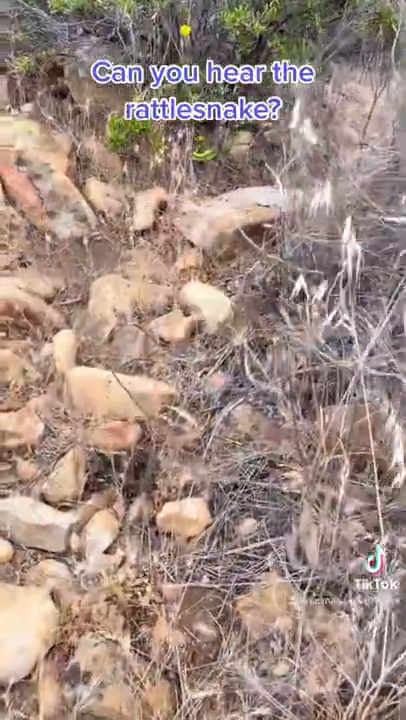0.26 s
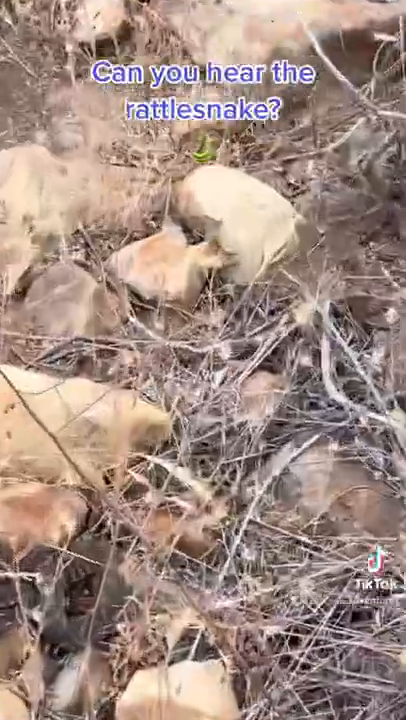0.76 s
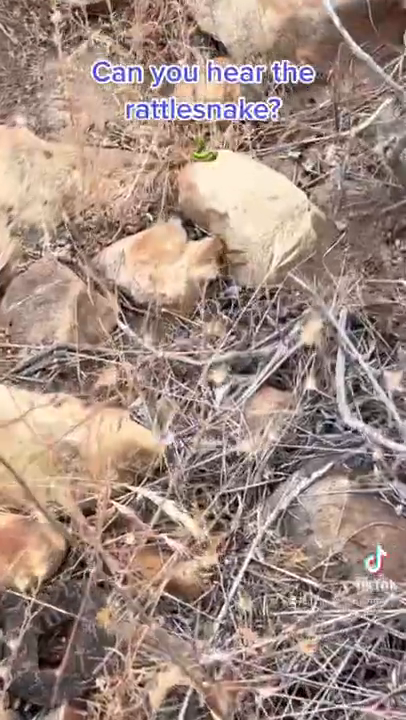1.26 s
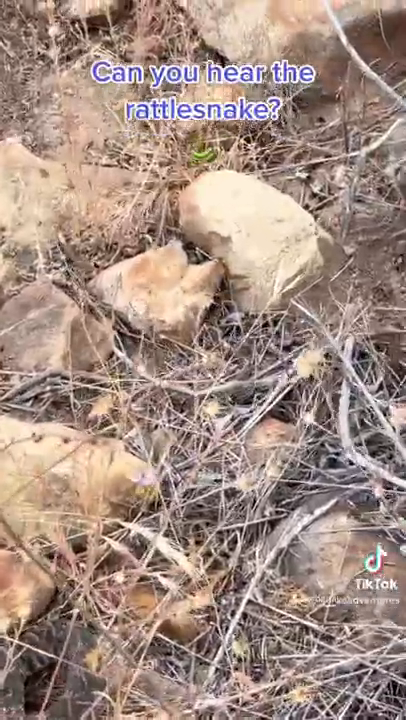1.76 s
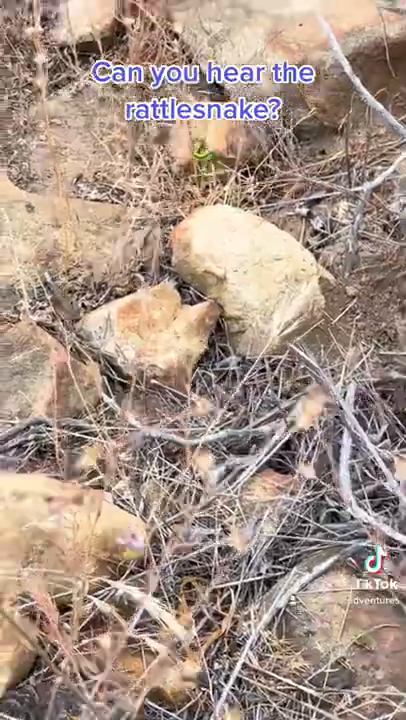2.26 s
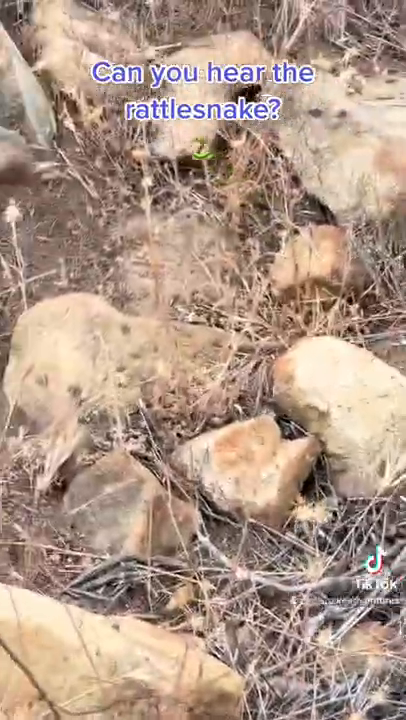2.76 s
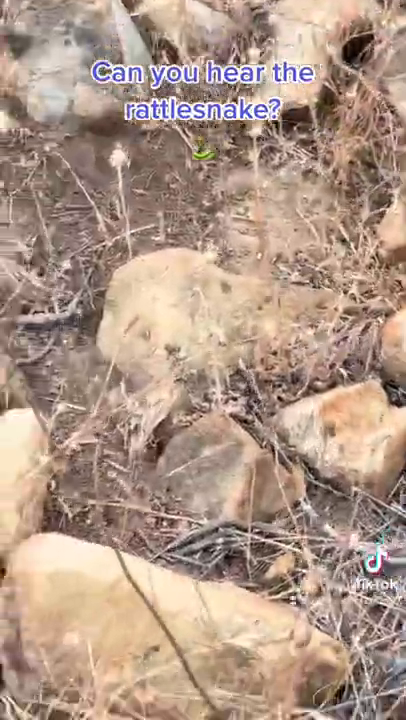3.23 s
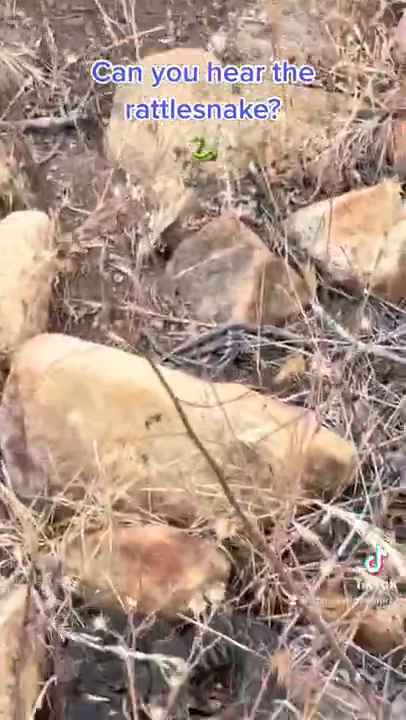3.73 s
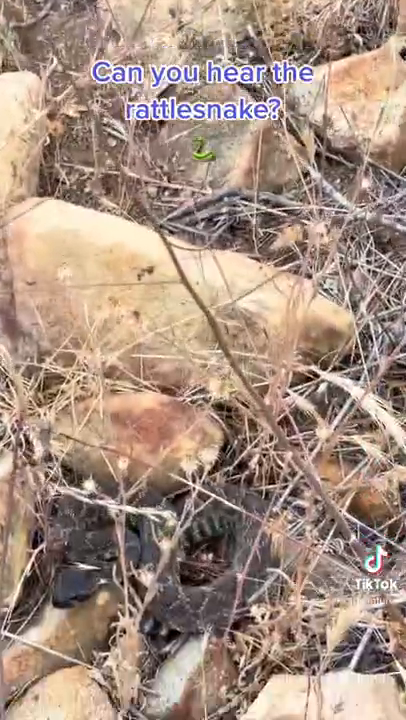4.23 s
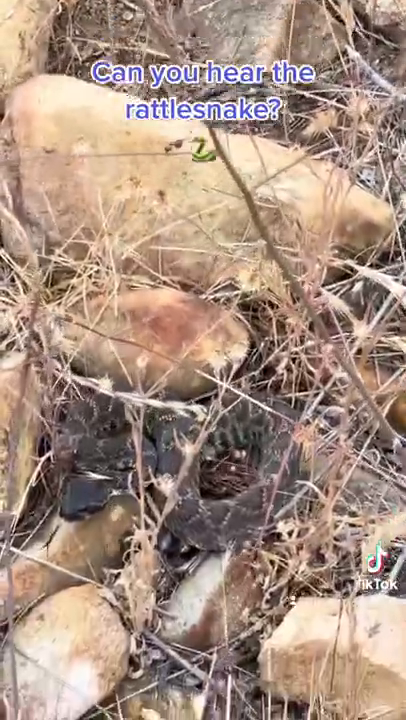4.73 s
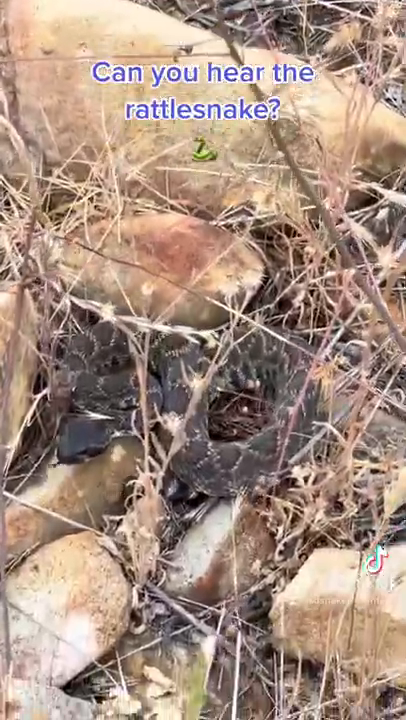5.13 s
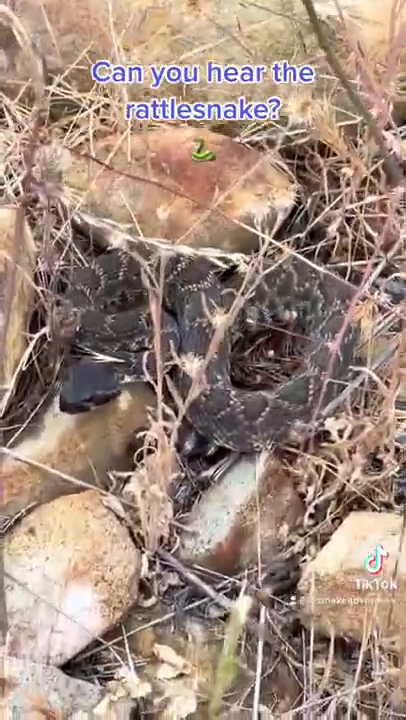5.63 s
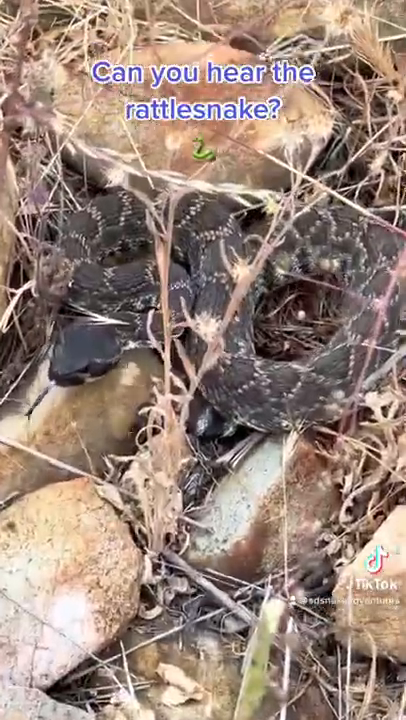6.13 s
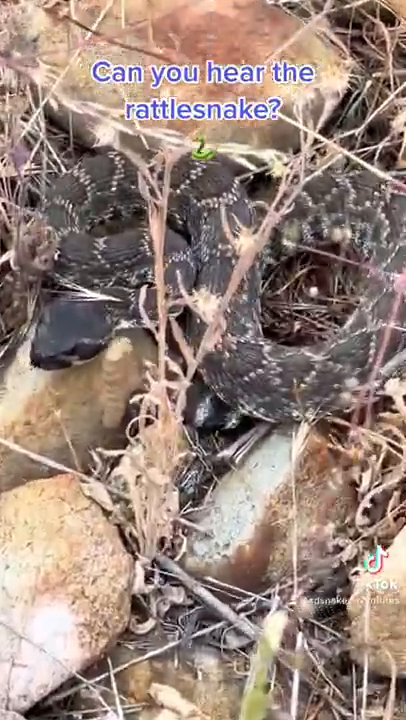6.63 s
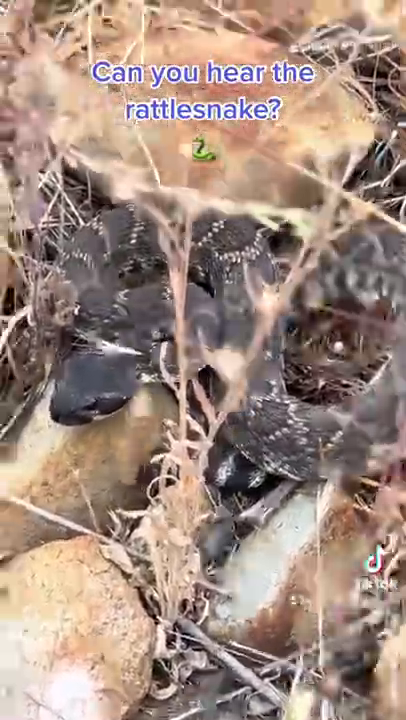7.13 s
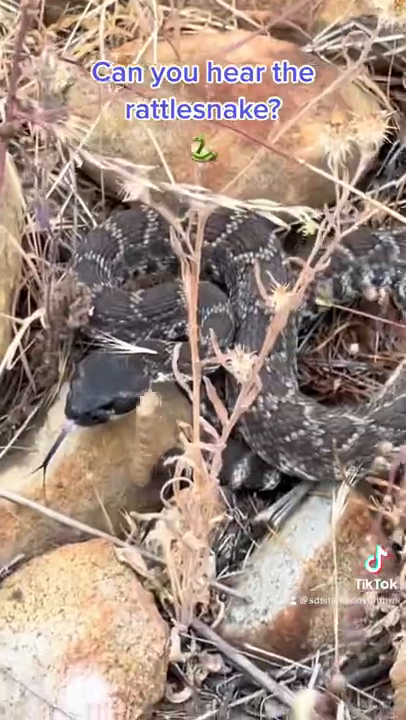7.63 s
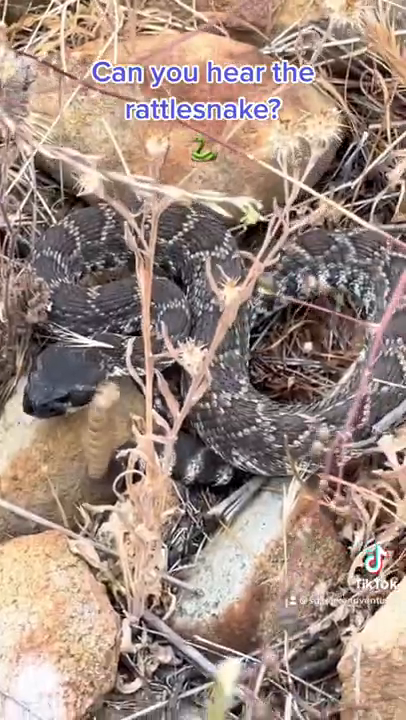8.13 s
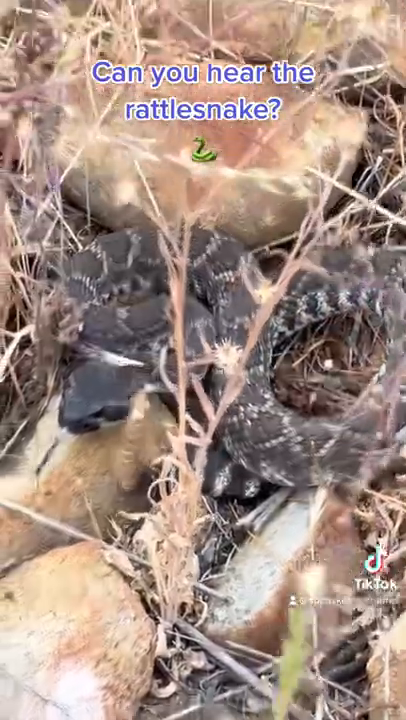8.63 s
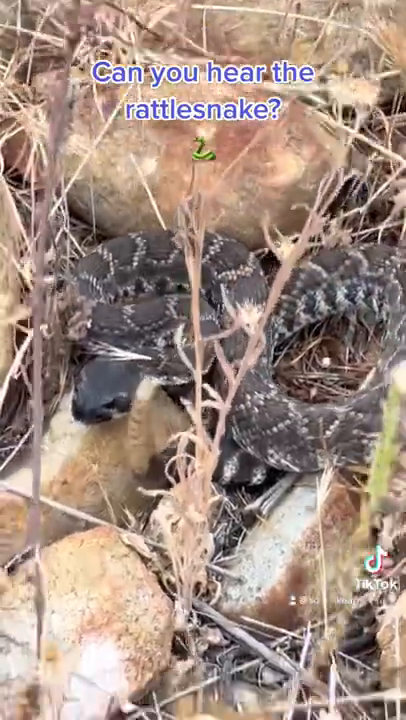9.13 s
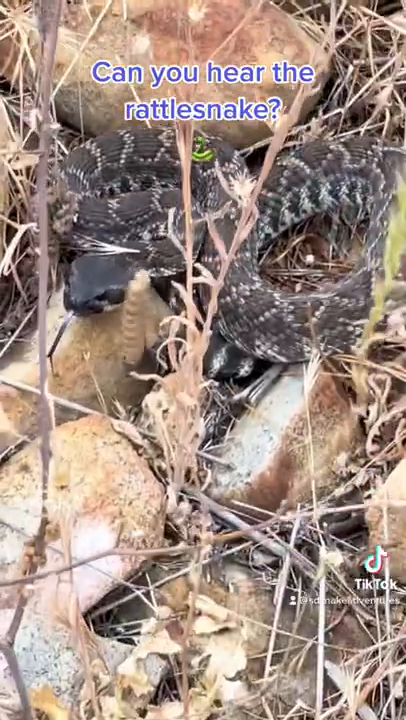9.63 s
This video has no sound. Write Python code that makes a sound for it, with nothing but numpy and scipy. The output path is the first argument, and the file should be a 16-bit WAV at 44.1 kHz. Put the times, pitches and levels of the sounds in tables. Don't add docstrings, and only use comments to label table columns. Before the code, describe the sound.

A continuous high rattle, like countless dry hollow beads shaken too fast to count, dominates from start to end and dulls very slightly. Wind puffs and a few muffled handling thumps open the scene, then a distant low motor drone joins quietly. Faint dry snaps come after seven seconds. Open stony ground, no room echo, heard by a handheld phone a couple of steps away.

```python
import sys
import numpy as np
from scipy import signal
from scipy.fft import rfft, irfft, next_fast_len
from scipy.io import wavfile
from scipy.ndimage import uniform_filter1d

SR = 44100
rng = np.random.default_rng(int(sys.argv[2]) if len(sys.argv) > 2 else 0)


def natural_amplitude(level_db):
    exponent = np.asarray(level_db, float) / 20
    return 10 ** exponent


def to_wav(s):
    ch = np.atleast_2d(s).T
    pcm = np.round(np.clip(ch, -1, 1) * 32767)
    wavfile.write(sys.argv[1], SR, pcm.astype(np.int16))


N = 435708

# t/s, swings/Hz
TAIL_SPEED = [(0.0, 100.2), (1.0, 97.35), (2.15, 94.8), (3.2, 96.25), (4.25, 96.27), (5.0, 94.5),
              (6.0, 95.16), (7.0, 93.94), (8.0, 94.3), (9.4, 96.9), (9.88, 95)]
# f/Hz, level/dB (per Hz)
HOLLOW_COLOUR = [(1500, -42.5), (1850, -28.5), (2400, -26), (2700, -16.5), (3100, -18), (4000, -7.5),
                 (4350, -4.5), (4550, 0), (4850, -3), (5250, -4), (6000, -7.5), (7000, -8.5), (8600, -15.5),
                 (11000, -41)]
# f/Hz, level/dB (per Hz)
RIM_COLOUR = [(5500, -41.5), (7800, -6.5), (8600, -8), (10200, -6), (11200, -2.5), (12700, -2.5),
              (14000, -4.5), (15600, -11), (15800, -27.5)]
# middle t/s, half length t/s, shade level/dB
PHONE_TILTS = [
    (0.852, 0.15, .2),
    (2.924, 1, 0.46),
    (5.7, 0.62, 0),
    (8.15, 0.18, 0.05),
    (9.2, 0.86, .25),
    (9.88, 0.11, .6),
]


def rattle():
    t = np.arange(N) / SR
    swings_hz = curve(TAIL_SPEED, t)[0]
    wag = np.cumsum(swings_hz) / SR / 2 + .008 * drift(hz=29.8)

    middle_s, half_s, shade_db = np.transpose(PHONE_TILTS)
    tires_db_per_s = 0.0525
    loss_db = tires_db_per_s * t + shade_db @ swells(middle_s, half_s)
    hollow_db = -36 - loss_db + 0.23 * drift(hz=24.7)
    rim_db = -35.5 - 4.5 * loss_db + 0.49 * drift(hz=25.15)

    hollow = rings(wag, HOLLOW_COLOUR, column=2, per_s=11000., spread_db=1.0, steady=.8, ripple_db=6.5)
    rims = rings(wag, RIM_COLOUR, column=3, per_s=16000., spread_db=1.95, steady=0.68, ripple_db=6.5)
    return natural_amplitude(hollow_db) * hollow + natural_amplitude(rim_db) * rims


# place/wag (0-1), spread/wag, hollow level/dB, rim level/dB
WAG_VOLLEYS = [
    (.04, .045, 1.5, 0),
    (.17, .04, 0.5, -1),
    (0.369, .025, 0, 4),
    (.53, .05, 2, -1),
    (.67, .03, -0.5, 0),
    (.85, .022, 0, 2.5),
    (0.921, .035, 1.5, -2),
]


def rings(wag, colour, column, per_s, spread_db, steady, ripple_db):
    place = np.arange(512) / 512
    crowd = np.full(512, float(steady))
    for volley in WAG_VOLLEYS:
        away = (place - volley[0] + .5) % 1 - .5
        crowd += natural_amplitude(2 * volley[column]) * np.exp(-.5 * (away / volley[1]) ** 2)
    crowd = (crowd / crowd.mean())[(wag % 1 * 512).astype(int)]

    strikes = rng.random(N) < per_s / SR * crowd
    sign = rng.choice([-1., 1.], N)
    size = np.minimum(rng.exponential(1, N), 4)
    blows = strikes * sign * natural_amplitude(spread_db * size)

    shells = knocks(colour, ripple_db, count=4)
    which = rng.integers(0, len(shells), N) == np.arange(len(shells))[:, None]
    facing = natural_amplitude([.9 * drift(hz=3.) for _ in shells])
    ringing = signal.oaconvolve(blows * which * facing, shells, axes=1)
    return evened(ringing.sum(0)[:N])


def knocks(colour, ripple_db, count=6, size=1024):
    ripples = uniform_filter1d(rng.standard_normal((count, size // 2 + 1)), 14, 1)
    bumps = natural_amplitude(ripple_db * evened(ripples))
    bumps = bumps / np.linalg.norm(bumps, axis=0)
    level = np.log(natural_amplitude(read(colour, np.fft.rfftfreq(size, 1 / SR))[0]) * bumps)
    full = np.concatenate([level, level[:, -2:0:-1]], axis=1)
    spectrum = np.exp(np.conj(signal.hilbert(full)))
    return np.fft.ifft(spectrum).real


# f/Hz, left leads/rad, likeness (0-1), left minus right level/dB
SETTLED_STEERING = [(3000, .35, .98, 0), (3600, .58, .97, 0), (4200, .6, .96, 0), (4550, .9, .94, 0),
                    (4900, 1.8, .88, 0), (5150, -.2, .95, 0), (6000, .66, .92, 0), (7800, 2.05, .84, 0),
                    (8600, 2.72, .92, 0), (10700, 3.3, .95, 0), (11400, 3.66, .92, 0), (12000, 4.1, .85, 0),
                    (13600, 5.25, .85, 0), (14100, 5.9, .94, 0), (15500, 6.4, .97, 0)]
# f/Hz, left leads/rad, likeness (0-1), left minus right level/dB
FIRST_STEERING = [(2100, 0, 0.81, 3), (2600, 1, 0.93, 10.5), (3320, 2.5, 0.5, 2.5), (4180, 0.5, 0.79, 17.5),
                  (4240, -2.5, 0.41, 15), (4900, 2, 0.38, 0), (5100, -1.2, 0.44, -4), (6170, 1, 0.82, 1)]


def snake():
    near = rattle()
    z = signal.stft(near, nperseg=128)[2]
    new_paths = np.exp(2j * np.pi * rng.random(z.shape))
    scattered = signal.istft(z * new_paths, nperseg=128)[1][:N]
    scattered *= np.std(near) / np.std(scattered)

    starting = FIRST_STEERING + [row for row in SETTLED_STEERING if row[0] > 5900]
    settles_s, fade_s = 0.552, 0.03
    settled = np.clip((np.arange(SR) / SR - settles_s) / fade_s, 0, 1)
    pair = steer(near, scattered, SETTLED_STEERING)
    first = steer(near[:SR], scattered[:SR], starting)
    pair[:, :SR] += (1 - settled) * (first - pair[:, :SR])
    return pair


def steer(near, scattered, table):
    size = next_fast_len(len(near))
    lead, same, balance_db = read(table, np.fft.rfftfreq(size, 1 / SR))
    same = np.clip(same, 0, 1)
    together = np.sqrt((1 + same) / 2) * rfft(near, size)
    apart = np.sqrt((1 - same) / 2) * rfft(scattered, size)
    left = (together + apart) * np.exp(.5j * lead)
    right = (together - apart) * np.exp(-.5j * lead) / natural_amplitude(balance_db)
    return irfft(np.array([left, right]), size)[:, :len(near)]


# t/s, peak level/dB, f/Hz, ring t60/s, left minus right level/dB
HAND_BUMPS = [
    (0.087, -49, 108, 0.056, 2.0),
    (0.18, -38.5, 142, 0.019, -1),
    (0.245, -34.5, 72, 0.14, 0.1),
    (0.345, -39, 95, 0.09, 0.1),
    (0.378, -41, 135, 0.023, 2),
    (0.385, -37, 57.4, 0.14, 0.1),
    (0.722, -36, 68, 0.1, 3),
    (1.243, -32, 150, 0.029, -0.5),
]


def hand():
    return taps(HAND_BUMPS, noisy=.03, rise_s=.008)


# t/s, peak level/dB, f/Hz, ring t60/s, left minus right level/dB
STEM_SNAPS = [
    (0.379, -44, 658, 0.017, -10),
    (0.381, -45.5, 330, 0.019, -1),
    (7.062, -54, 880, 0.045, -6),
    (7.512, -51, 704, 0.012, 0.5),
    (7.668, -48.5, 720, 0.012, 5),
    (7.996, -52, 1810, 0.016, 7),
    (8.02, -49, 1210, 0.014, 10),
    (8.506, -42.5, 1740, 0.023, 0.5),
    (8.511, -51.5, 850, 0.014, 3),
    (9.835, -54.5, 1150, 0.016, 11),
]


def stems():
    return taps(STEM_SNAPS, noisy=.3, rise_s=.002)


def taps(events, noisy, rise_s):
    out, t = np.zeros((2, N + 4096)), np.arange(4096) / SR
    for s, db, hz, t60, pan_db in events:
        band = signal.butter(2, [hz * .5, hz * 1.25], "band", fs=SR, output="sos")
        crackle = evened(signal.sosfilt(band, rng.standard_normal(4096)))
        tone = np.sin(2 * np.pi * hz * t)
        shape = (1 - np.exp(-(t / rise_s) ** 2)) * natural_amplitude(-60 * t / t60)
        tap = shape * ((1 - noisy) * tone + noisy * crackle)
        sides_db = db + np.array([[pan_db], [-pan_db]]) / 2
        at = round(s * SR)
        out[:, at:at + 4096] += natural_amplitude(sides_db) * tap / np.abs(tap).max()
    return out[:, :N]


# multiple of its lowest pitch, level/dB
ENGINE_TONES = [(1, 0), (2, -15), (3, -28.5), (4, -31.5)]


def drone():
    t = np.arange(N) / SR
    idle_hz, pulls_hz, pulls_s, pull_time_s = 76.2, 77.7, 5.2, .15
    hz = idle_hz + (pulls_hz - idle_hz) * np.clip((t - pulls_s) / pull_time_s, 0, 1)
    turns = np.cumsum(hz + 0.55 * drift(hz=3.87)) / SR

    nears_db_per_s, passes_s, passes_db_per_s = 0.3361, 9.2, 8.5
    db = -54. + nears_db_per_s * t + passes_db_per_s * np.maximum(t - passes_s, 0)
    tones = np.zeros(N)
    for multiple, tone_db in ENGINE_TONES:
        level = np.sqrt(2) * natural_amplitude(db + tone_db + 1.4 * drift(hz=7.))
        tones += level * np.sin(2 * np.pi * multiple * turns)
    arrives_s, fade_s = 1.39, 0.2
    return np.clip((t - arrives_s) / fade_s, 0, 1) * tones


# f/Hz, level/dB (per Hz)
RUMBLE_COLOUR = [(20, -39), (30, -22.5), (45, -0.5), (60, 2.5), (100, -4.5), (170, -16.5), (250, -26),
                 (400, -33.5), (800, -56.5)]
# f/Hz, likeness (-1 to 1)
RUMBLE_LIKENESS = [(20, .995), (125, .99), (400, .85)]
# f/Hz, level/dB (per Hz)
RUSTLE_COLOUR = [(120, -38), (200, 1.5), (237, -3), (286, -8.5), (388, -7.5), (641, -7.5), (1700, -13.5),
                 (2210, -54.5), (3740, -120)]
# f/Hz, likeness (-1 to 1)
RUSTLE_LIKENESS = [(200, .8), (330, .5), (500, .1), (770, -.1), (1100, .15), (1400, .55), (1800, .95)]
# middle t/s, half length t/s, rumble lift level/dB, rustle lift level/dB
WIND_PUFFS = [(0.12, 0.17, 8, 3.5), (0.363, 0.26, 7, 3), (0.8, .2, 0.5, -1.5), (1.154, 0.44, 4.5, -1),
              (1.56, 0.33, 4, -0.5), (1.914, .12, 3, 4), (2.622, 0.28, 2, 3.5), (3.6, 0.21, 2, 1.5),
              (5.23, 0.24, 2.5, 3.5), (6.1, .3, 1, -1.5), (7.06, .12, 4, 4.5), (7.575, 0.34, 3.5, 2),
              (8.65, 0.51, 1.5, 6.5), (9.22, .15, 3, 2), (9.696, 0.58, 2.5, 3.5)]


def air():
    middle_s, half_s, *lifts_db = np.transpose(WIND_PUFFS)
    rumble_lift_db, rustle_lift_db = lifts_db @ swells(middle_s, half_s)
    rumble_db = -54.5 + rumble_lift_db
    rustle_db = -71 + rustle_lift_db + [[3.6], [2.4]]
    rumble = natural_amplitude(rumble_db) * hiss(RUMBLE_COLOUR, RUMBLE_LIKENESS, patchy_db=0.5)
    rustle = natural_amplitude(rustle_db) * hiss(RUSTLE_COLOUR, RUSTLE_LIKENESS, patchy_db=1.3)
    return rumble + rustle


def hiss(colour, same, patchy_db):
    frames, hz = N // 512 + 5, np.fft.rfftfreq(2048, 1 / SR)[:190]
    a, b, c, d, patches = rng.standard_normal((frames, len(hz), 5)).T
    patches = uniform_filter1d(patches, size=9, axis=0)
    patches = evened(uniform_filter1d(patches, size=7, axis=1))
    same = np.clip(read(same, hz)[0], -1, 1)[:, None]
    left, other = a + 1j * b, c + 1j * d
    z = np.array([left, same * left + np.sqrt(1 - same ** 2) * other])
    z *= natural_amplitude(read(colour, hz)[0][:, None] + patchy_db * patches)
    z = np.pad(z, ((0, 0), (0, 1025 - len(hz)), (0, 0)))
    return evened(signal.istft(z, nperseg=2048, noverlap=1536)[1][:, :N])


def swells(middle_s, half_s):
    away = (np.arange(N) / SR - np.c_[middle_s]) / np.c_[half_s]
    return np.cos(np.pi / 2 * np.clip(away, -1, 1)) ** 2


def drift(hz):
    knots = rng.standard_normal(N // 64 + 2000)
    slow = signal.butter(3, hz, fs=SR / 64, output="sos")
    smooth = evened(signal.sosfilt(slow, knots)[1000:])
    return np.interp(np.arange(N) / 64, np.arange(len(smooth)), smooth)


def evened(x):
    return x / np.sqrt(np.mean(np.abs(x) ** 2) + 1e-30)


def read(points, hz):
    f, *columns = np.transpose(points)
    return np.array([np.interp(np.log(hz + 1), np.log(f + 1), c) for c in columns])


def curve(rows, t):
    s, *columns = np.transpose(rows)
    return np.array([np.interp(t, s, c) for c in columns])


def scene():
    return snake() + hand() + stems() + drone() + air()


BAND_EDGES = np.r_[0:40:4, 40:96:8, 96:144:12, 144, 160, 176, 196, 216, 240, 264, 292, 320:1025:32]
# f/Hz, band level over rounding step/dB
ROUNDING = [(40, 26), (200, 15), (400, 10), (1200, 6), (2300, 6.5), (3000, 7), (4500, 12), (7500, 8),
            (13000, 10), (15500, 6.5)]


def coarse_pass(x, margin_db, waver_db, hole, from_hz):
    n, k = np.arange(2048), np.arange(1024)
    window = signal.windows.kaiser_bessel_derived(2048, 4 * np.pi)
    basis = window[:, None] * np.cos(np.pi / 1024 * np.outer(n + 512.5, k + .5)) / np.sqrt(512)
    lead, frames = 2048 - 336, N // 1024 + 4
    pair = np.pad([x[0] + x[1], x[0] - x[1]], ((0, 0), (lead, frames * 1024 - N - lead)))
    blocks = pair.reshape(2, frames, 1024)
    lines = np.concatenate([blocks[:, :-1], blocks[:, 1:]], axis=2) @ basis

    width, hz = np.diff(BAND_EDGES), BAND_EDGES[:-1] * SR / 2048
    power = np.add.reduceat(lines ** 2, BAND_EDGES[:-1], axis=2) / width
    level = np.sqrt(power) + 1e-12
    stronger = level.max(0)
    waver = evened(uniform_filter1d(rng.standard_normal(level.shape), size=3, axis=1))
    limit = stronger * natural_amplitude(-margin_db + waver_db * waver)
    kept = (level > limit) | (hz < from_hz)
    step = np.where(hz < from_hz, level, stronger) / natural_amplitude(read(ROUNDING, hz)[0] - 3.5 * waver)
    step, kept = np.repeat(step, width, axis=2), np.repeat(kept, width, axis=2)

    nearby = uniform_filter1d(uniform_filter1d(lines ** 2, size=4, axis=2), size=2, axis=1)
    kept &= np.sqrt(abs(nearby)) > hole * step
    kept &= k * SR / 2048 < 15770
    rounded = step * np.sign(lines) * np.floor(np.abs(lines) / step + .4)
    halves = (kept * rounded) @ basis.T
    blocks = halves[:, 1:, :1024] + halves[:, :-1, 1024:]
    mid, side = blocks.reshape(2, -1)[:, lead - 1024:][:, :N]
    return np.array([mid + side, mid - side]) / 2


def top_cut(x):
    return signal.sosfilt(signal.butter(12, 16160, fs=SR, output="sos"), x)


def record(dry):
    bass_cut = signal.butter(3, 42, "high", fs=SR, output="sos")
    mix = signal.sosfilt(bass_cut, dry)
    mix = coarse_pass(mix, margin_db=7.8, waver_db=1.2, hole=1.15, from_hz=1100.)
    return top_cut(mix)


dry = scene()
out = record(dry)
to_wav(out)
```